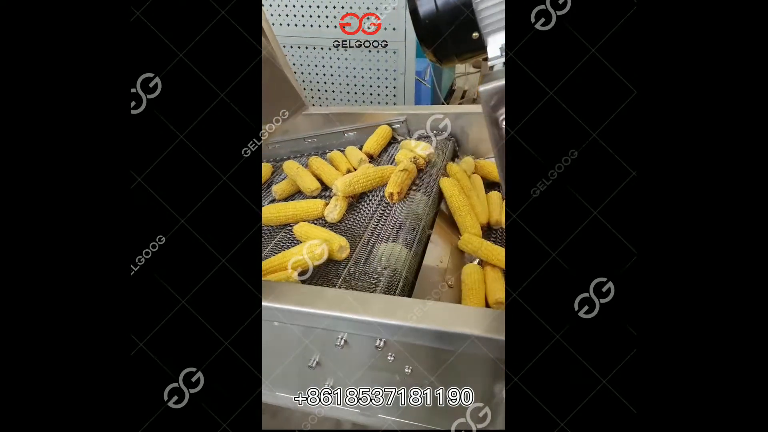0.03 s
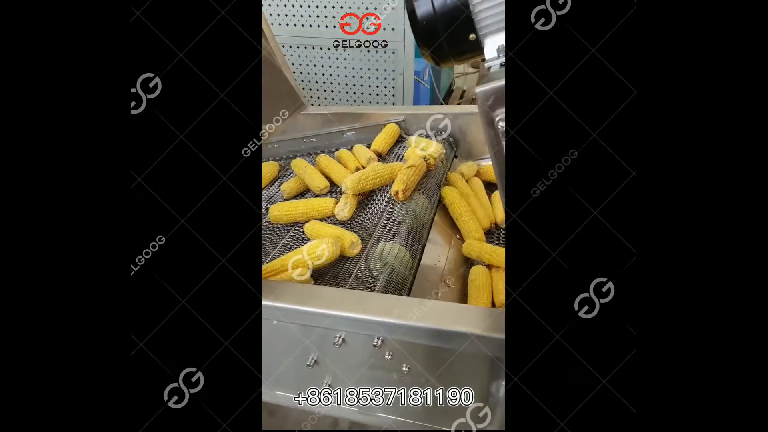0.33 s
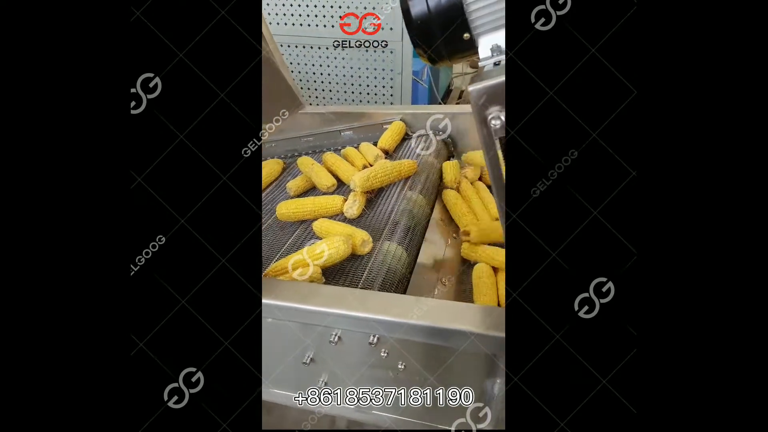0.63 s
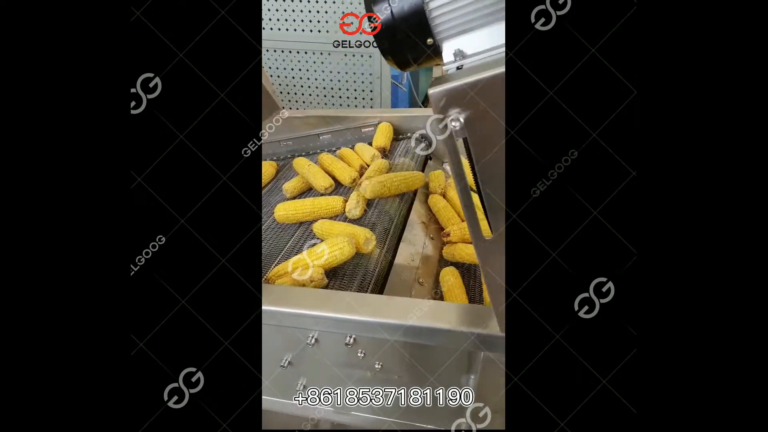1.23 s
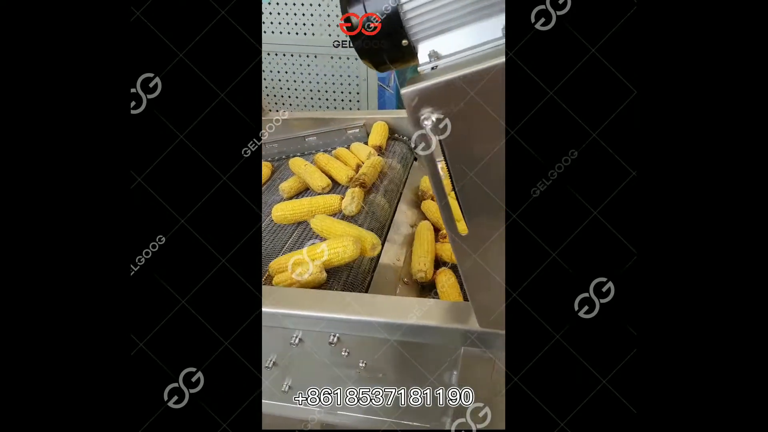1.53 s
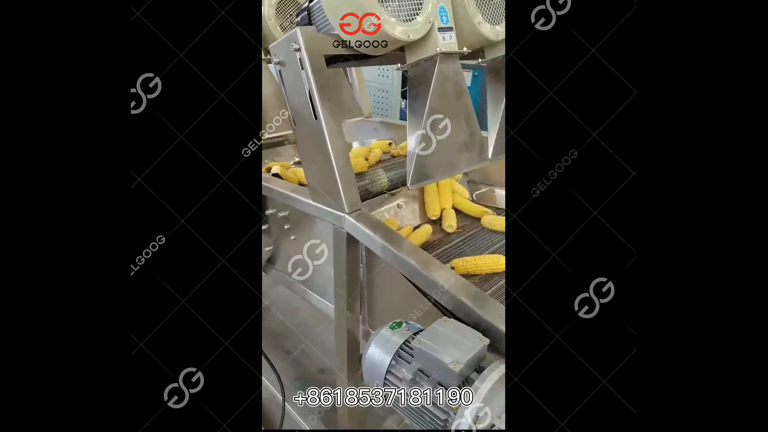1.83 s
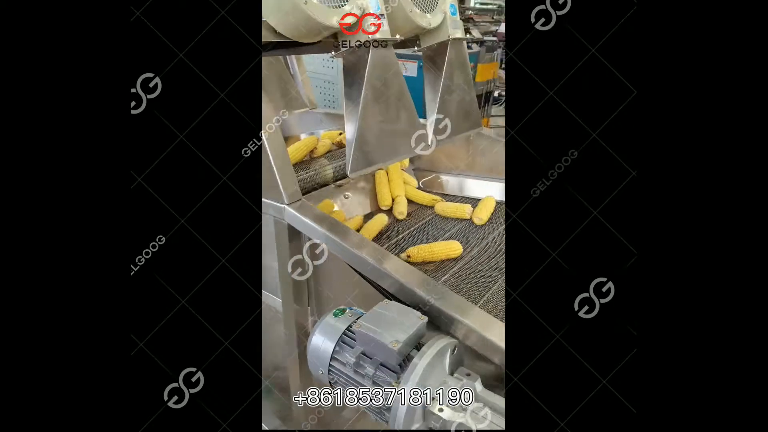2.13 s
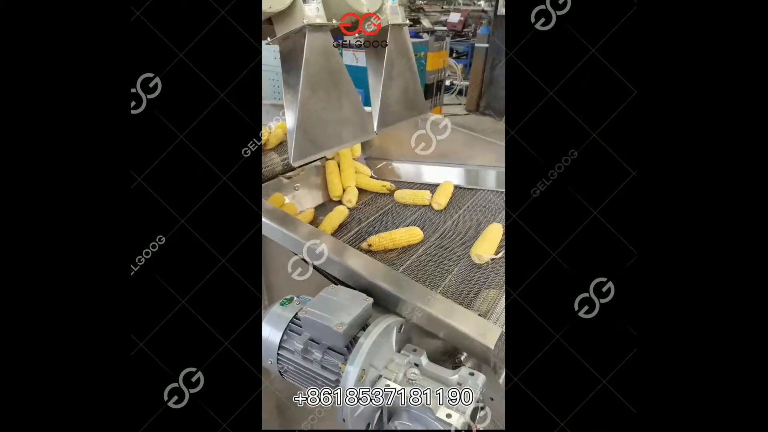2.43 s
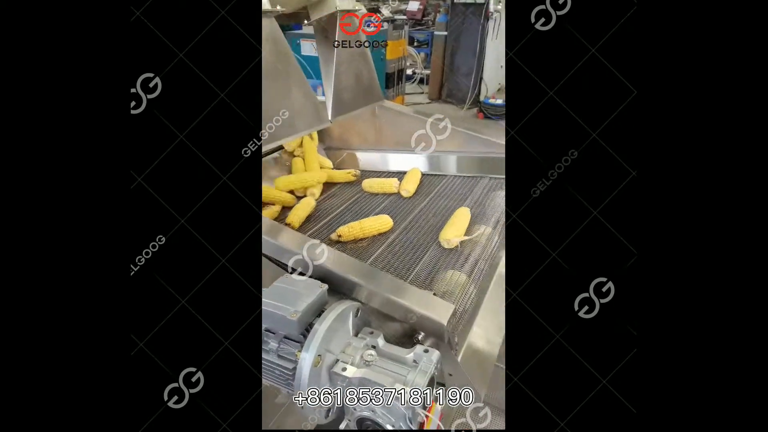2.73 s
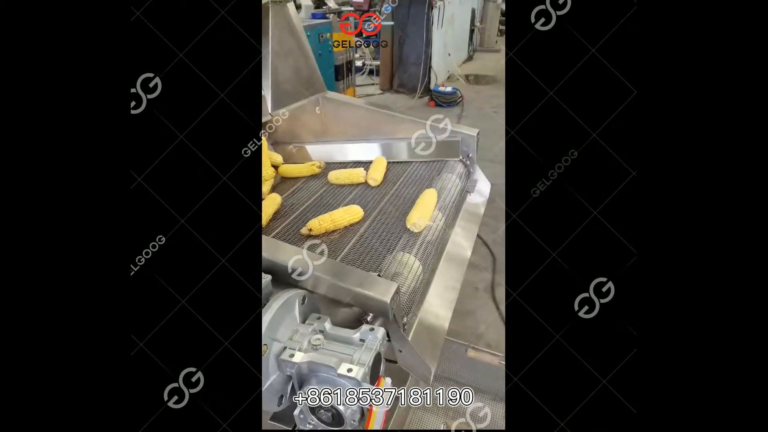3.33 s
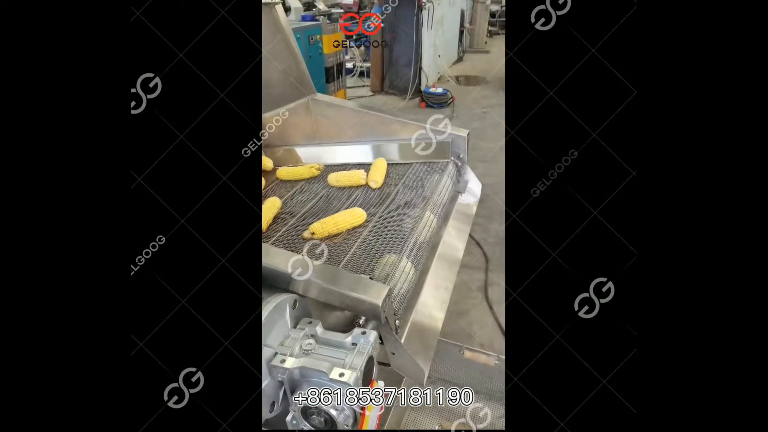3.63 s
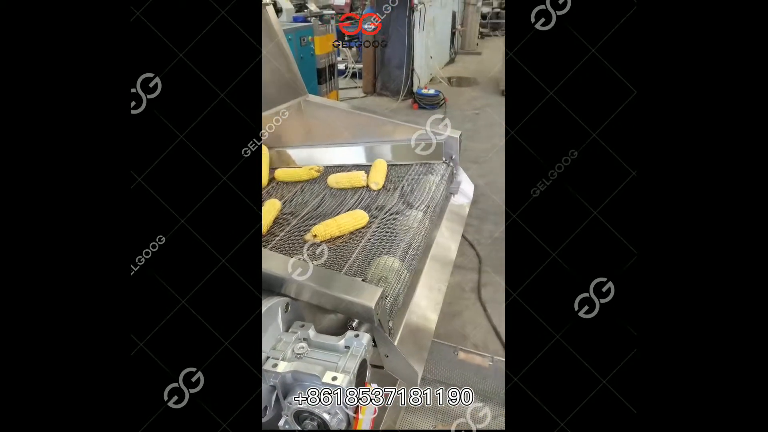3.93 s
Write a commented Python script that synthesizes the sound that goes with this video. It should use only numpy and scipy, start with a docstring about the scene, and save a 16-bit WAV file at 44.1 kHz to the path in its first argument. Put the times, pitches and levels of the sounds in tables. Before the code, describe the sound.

Water jets hiss over churning water, thudding corn cobs and motors in a washing machine.

```python
"""Vegetable washing line in a workshop

Beside the machine, water jets hiss and patter on a mesh conveyor and set the steel chutes ringing.
Churning water rumbles and glugs in the steel tank, corn cobs thud against it, pump and motors whine.
The sound drops out for a moment as the microphone moves from the infeed to the outfeed,
where water splashes near the end."""
import sys
import numpy as np
from scipy import signal
from scipy.fft import rfft, irfft
from scipy.io import wavfile

SR = 44100
rng = np.random.default_rng(int(sys.argv[2]) if len(sys.argv) > 2 else 0)


def dump_mix(stems):
    """Bounce the given channels to the path in sys.argv[1] as a 16-bit WAV at rate SR."""
    frames = np.atleast_2d(stems).T  # one column per channel
    limited = np.clip(frames, -1, 1)  # hard clip at full scale
    pcm = np.round(limited * 32767).astype(np.int16)
    wavfile.write(sys.argv[1], SR, pcm)


N = 176400
T = np.arange(N) / SR
MOVE_S = 1.7435   # the microphone goes from infeed to outfeed


def from_db(db):
    """Decibels to amplitude."""
    return np.exp(np.asarray(db) * np.log(10) / 20)


def rms_one(x):
    """Scale to an rms of 1."""
    return x / np.sqrt(np.mean(x ** 2) + 1e-20)


def in_time(rows):
    """Join (seconds, value) points into a curve over the whole scene."""
    return np.interp(T, *np.transpose(rows))


def at_hz(points, hz):
    """Read (Hz, value) points along a logarithmic frequency axis."""
    freqs, values = np.transpose(points)
    return np.interp(np.log(hz), np.log(freqs), values)


def pan(db):
    """Left and right gains of constant total power, the left louder by db."""
    return rms_one(from_db([[db / 2], [-db / 2]]))


def drift(rate_hz):
    """Smooth random wander with a spread of 1."""
    step, settle = 40, 2000
    r = np.exp(-2 * np.pi * step * rate_hz / SR)
    slow = signal.lfilter([1], [1, -2 * r, r * r], rng.standard_normal(N // step + settle + 2))[settle:]
    return np.interp(np.arange(N) / step, np.arange(len(slow)), rms_one(slow))


def ring(clicks, hz, t60):
    """A unit click sets a sine of height 1 ringing."""
    r, w = np.exp(-np.log(1000) / (t60 * SR)), 2 * np.pi * hz / SR
    return signal.lfilter([0, np.sin(w)], [1, -2 * r * np.cos(w), r * r], clicks + 1e-18)


def resonance(x, hz, width_hz):
    """Two-pole resonance with a gain of 1 at its peak."""
    r, w = np.exp(-np.pi * width_hz / SR), 2 * np.pi * hz / SR
    return signal.lfilter(np.array([1, 0, -1]) * (1 - r * r) / 2, [1, -2 * r * np.cos(w), r * r], x)


def banded_noise(spectrum, balance, low_hz, high_hz, flicker_db, flicker_hz, bands):
    """Stereo noise of rms 1; each band has its own level, flicker and side."""
    # How alike the two channels are. Each row: frequency in Hz, correlation.
    likeness = [(60, 0.53), (130, 0.2), (290, 0.18), (640, 0.053), (1400, 0)]
    out, edges = 0, np.geomspace(low_hz, high_hz, bands + 1)
    white = rng.standard_normal((2, 2, N))
    for k, (low, high) in enumerate(zip(edges, edges[1:])):
        bandpass = signal.butter(3, [low, high], "band", fs=SR, output="sos")
        mid, side = signal.sosfilt(bandpass, white[k % 2])
        hz = np.sqrt(low * high)
        alike = at_hz(likeness, hz)
        gain = from_db(at_hz(spectrum, hz) + flicker_db * drift(flicker_hz)) * pan(at_hz(balance, hz))
        out += gain * (np.sqrt(1 + alike) * mid + np.sqrt(1 - alike) * side * [[1], [-1]])
    return rms_one(out)


def outfeed_share():
    """0 with the microphone at the infeed, 1 at the outfeed, crossing over in 10 ms."""
    return np.clip((T - MOVE_S) / 0.01 + .5, 0, 1)


def motors():
    """Wavering tones; the higher ones are rougher and reach each channel by different reflections."""
    # Pump and motor tones, and a steel chute ringing near 1.9 kHz. Each row: pitch in Hz, width in Hz, level at
    # the infeed in dB, level at the outfeed in dB, left over right in dB.
    tones = [(146.3, 5.6, -44.5, -43, 2), (191, 3.8, -41, -43.5, -6), (345, 3.4, -42.5, -38.5, 0),
             (492.7, 7.2, -46, -44, 5.5), (958, 10, -46.5, -61, 3), (1240, 11, -49.5, -52, 9),
             (1928, 26, -44.5, -51, 5), (12000, 7, -65, -62, 9)]
    steady_below_hz, alike_below_hz = 402, 340
    out = 0
    for hz, width, in_db, out_db, side_db in tones:
        core = steady_below_hz / hz
        paths = np.array([rms_one(core * np.exp(1j * path) + 0.81 * (drift(width) + 1j * drift(width)))
                          for path in range(3)])
        waver = paths[:2] + paths[2] * alike_below_hz / hz   # the third path reaches both channels
        tone = rms_one(np.real(waver * np.exp(2j * np.pi * hz * T)))
        out += tone * pan(side_db) * from_db(in_db + (out_db - in_db) * outfeed_share())
    return out


def pump_whine():
    """The pump sings one wandering tone whose strength flutters in each channel."""
    # Swell of the whine. Each row: time in seconds, level in dB.
    level = [(0, -47), (.2, -42), (.5, -50), (.65, -42), (.76, -48), (1.0, -45.5), (1.35, -41), (1.48, -43),
             (1.58, -43), (2.0, -48), (2.4, -43), (2.66, -47), (2.77, -41), (2.93, -39), (2.98, -47),
             (3.2, -42), (3.5, -47), (4, -43)]
    pitch_hz, wander_hz, flutter_db, apart_radians = 1087, 4.5, 2.6, 0.54
    phase = 2 * np.pi * np.cumsum(pitch_hz + wander_hz * drift(13.5)) / SR
    pair = np.zeros((2, N))
    for channel in range(2):
        tone = np.sin(phase + channel * apart_radians + 0.77 * drift(7.9))
        pair[channel] = tone * from_db(flutter_db * drift(14))
    return rms_one(pair) * pan(2.5) * from_db(in_time(level))


def drops():
    """Drops patter on mesh and steel, each ringing for a few cycles."""
    drops_per_s, level_db, spread_db, cycles = 990, -43, 3, 2
    sizes = from_db(spread_db * np.minimum(rng.exponential(1, (2, N)), 4))
    clicks = sizes * rng.choice([-1, 1], (2, N)) * (rng.random((2, N)) < drops_per_s / SR)
    pitches = np.geomspace(1800, 13000, 12)
    pitch_index = rng.integers(0, len(pitches), (2, N))
    patter = sum(ring(clicks * (pitch_index == k), hz, cycles / hz) for k, hz in enumerate(pitches))
    return from_db(level_db) * rms_one(patter)


def glugs():
    """A pocket of water rings roughly, swelling and dying while its pitch sags."""
    # Hollow glugs in the tank. Each row: start in seconds, peak level in dB, starting pitch in Hz.
    pockets = [(.535, -30, 890), (.675, -30, 910), (1.785, -29, 850), (2.31, -37, 870), (2.655, -36, 888),
               (3.595, -34, 854), (3.685, -37, 836)]
    peak_s, sag_octaves_per_s, roughness_hz = 0.012, 2.83, 53
    out = np.zeros((2, N))
    for start_s, db, hz in pockets:
        age = np.maximum(T - start_s, 0)
        phase = 2 * np.pi * np.cumsum(hz * 2 ** (-sag_octaves_per_s * age)) / SR
        pair = np.array([np.sin(phase + 1.1 * drift(roughness_hz)) for channel in range(2)])
        out += pair * from_db(db) * age / peak_s * np.exp(1 - age / peak_s)
    return out


def splashes():
    """Bursts of spray rise quickly and die away."""
    # Splashes. Each row: start in seconds, level in dB, attack and decay in seconds,
    # centre in Hz, width in octaves.
    bursts = [(.61, -29, 0.0046, 0.018, 6000, 1.0), (1.785, -26.5, 0.028, 0.041, 5000, 1.2),
              (1.785, -24.5, 0.017, 0.014, 710, 1.2), (3.735, -28.5, 0.032, 0.063, 3200, 1.0),
              (3.818, -21.5, 0.01, 0.017, 8200, .65), (3.832, -26, 0.025, 0.033, 5460, .85)]
    out, hz = 0, np.maximum(np.fft.rfftfreq(N, 1 / SR), 1)
    for start_s, db, attack, decay, centre_hz, octaves in bursts:
        band = np.exp(-.5 * (np.log2(hz / centre_hz) / octaves) ** 2)
        noise = rms_one(irfft(rfft(rng.standard_normal((2, N))) * band, N))
        age = T - start_s
        envelope = np.clip(age / attack, 0, 1) * np.exp(-np.maximum(age - attack, 0) / decay)
        out += noise * from_db(db) * envelope
    return out


def tank_water():
    """Churning water shakes the tank and sloshes inside it."""
    # Spectra of rumble and slosh. Each row: frequency in Hz, relative density in dB.
    rumble_spectrum = [(25, -50), (40, -48), (60, -23.5), (80, -13.5), (110, -11), (140, -1.5), (200, -2),
                       (260, -1.5), (350, 3), (410, -5.5), (460, -11.5), (560, -20), (900, -16)]
    slosh_spectrum = [(350, -32), (580, 2), (800, 13), (1100, 0), (2500, 3)]
    # Surges of the churning. Each row: time in seconds, dB added to the rumble.
    churn = [(0, 2), (.35, -1.5), (.62, 2.5), (1.0, -2), (1.5, 1), (1.8, 0), (2.05, -2), (2.4, 0),
             (2.6, -2), (2.85, -3.5), (3.1, -3), (3.55, -1.5), (3.88, -3.5), (4, -2)]
    # Swell of the slosh. Each row: time in seconds, level in dB.
    slosh_level = [(0, -47), (.45, -41), (.6, -37.5), (.7, -37.5), (.8, -42), (1.15, -46), (1.45, -51),
                   (1.7, -50), (2.2, -37), (2.65, -48.5), (3.52, -43.5), (3.61, -34), (3.7, -47), (4, -51)]
    rumble_db = -28
    rumble = banded_noise(rumble_spectrum, [(60, .8), (150, 1.8), (350, 2.5)], 22.66, 969,
                          flicker_db=1.0, flicker_hz=29, bands=18)
    slosh = banded_noise(slosh_spectrum, [(600, 1.2), (1200, 0.89)], 433, 2404,
                         flicker_db=4.5, flicker_hz=11, bands=9)
    return from_db(rumble_db + in_time(churn)) * rumble + from_db(in_time(slosh_level)) * slosh


def cob_thuds():
    """Each cob tumbles softly against the steel tank and rings every mode with a strength of its own."""
    # Cob strikes. Each row: start in seconds, relative level in dB, pitch excited most in Hz,
    # attack in seconds.
    strikes = [(.002, 2.5, 240, 0.0019), (.045, 4.5, 199, 0.0075), (.189, -1, 337, 0.0055),
               (.235, -3, 175, .004), (.4, -1.5, 283, 0.0027), (.44, -2, 350, .01), (.52, 8.5, 108, 0.0069),
               (.605, -4, 160, .003), (.675, -0.5, 210, .005), (0.829, 0, 215, .005),
               (.89, -2, 288, 0.0034), (1.04, -4, 350, 0.0071), (1.311, .5, 186, .007),
               (1.408, 5, 285, .005), (1.425, -2.5, 130, 0.0057), (1.475, -1.5, 350, .008),
               (1.54, 6, 344, .007), (1.59, 3, 245, .005), (1.795, -3, 197, .003), (1.91, -7, 300, .003),
               (2.305, 4.5, 283, .003), (2.309, -1.5, 155, .004), (2.35, -1, 150, .005),
               (2.663, 1.5, 320, .003), (2.684, 0.5, 180, 0.015), (3.209, -2.5, 140, .003),
               (3.345, 2, 187, 0.0069), (3.375, -2.5, 187, .005), (3.455, 0, 200, 0.0073),
               (3.489, -0.5, 325, 0.0033), (3.506, -0.5, 150, .003), (3.551, 0.5, 215, 0.0025),
               (3.575, 4.5, 215, 0.0035), (3.723, -1, 200, 0.0027)]
    # Modes of the tank. Each row: pitch in Hz, relative level in dB, seconds to fall by 60 dB.
    modes = [(104, -4, 0.14), (129.2, -3.5, 0.22), (147, -2.5, 0.27), (189.2, 5, 0.14),
             (228.2, -10.5, 0.44), (254, 1.5, 0.11), (298, -14.5, 0.047), (328.3, 1, 0.15), (383, -1, 0.19)]
    base_db, scatter_db, reach_octaves, low_cut_hz = -22, 1.5, 0.33, 71.5
    out = np.zeros((2, N))
    for start_s, db, centre_hz, attack in strikes:
        start = int(start_s * SR)
        age = T[:min(N - start, SR // 3)]
        for hz, mode_db, t60 in modes:
            strength, turn, apart = rng.standard_normal(3)
            reach = 1 / (1 + (np.log2(hz / centre_hz) / reach_octaves) ** 2)
            level_db = base_db + db + mode_db + scatter_db * strength - 60 * age / t60
            envelope = reach * from_db(level_db) * (1 - np.exp(-age / attack))
            phase = 2 * np.pi * (hz * age + turn) + apart * np.array([[.5], [-.5]])
            out[:, start:start + len(age)] += envelope * np.sin(phase)
    low_cut = signal.butter(3, low_cut_hz, "high", fs=SR, output="sos")
    return signal.sosfilt(low_cut, out) * pan(1.2)


def jets():
    """Jets hiss, coloured by the chutes and the microphone's place; the treble swells with the spray."""
    # Hiss at each end of the line. Each row: frequency in Hz, relative density in dB.
    in_spectrum = [(500, -2.5), (600, -6.5), (900, -7), (1040, -7), (1700, -9.5), (2200, -7), (4000, -8.5),
                   (6000, -12), (8700, -12), (10000, -16.5), (11500, -14.5), (12700, -19), (15500, -21.5)]
    out_spectrum = [(500, -14.5), (600, -5.5), (880, -5), (1020, -8.5), (1700, -8.5), (2200, -7.5),
                    (4700, -7), (5700, -10), (7000, -9), (9000, -11), (10000, -13), (11600, -14.5),
                    (12700, -16), (15500, -20.5)]
    # Stereo balance at each end. Each row: frequency in Hz, left over right in dB.
    in_pan = [(600, 4.5), (1100, -2.5), (2400, 1), (4400, 2), (8100, 3.5), (10000, 0.5), (14000, -0.5)]
    out_pan = [(600, 3.5), (1500, 0), (2200, .5), (3500, 2.5), (5000, 2.2), (8200, 3.5), (10000, 1.5),
               (11500, -6), (13000, 1.5)]
    # Steel chutes ringing in the spray. Each row: pitch in Hz, width in Hz, gain at infeed, at outfeed.
    chutes = [(890, 42, 0.18, 0.28), (1510, 100, 0.4, 0.21), (2104, 84, 0.44, 0.83),
              (2600, 170, 0.045, 0.32), (3140, 140, 0.044, 0.16), (4820, 150, 0.11, 0.29)]
    # Fine spray. Each row: time in seconds, treble gain in dB.
    spray = [(0, 0.2), (.45, 0.8), (.62, 0.5), (1.0, 0.2), (1.6, 0.7), (2.1, -1.1), (2.6, -1), (3.15, -0.5),
             (3.3, 0.9), (3.45, -1.1), (3.75, -0.5), (4, -2.5)]
    infeed_db, outfeed_db, spray_hz = -28.5, -28.13, 5000
    infeed = banded_noise(in_spectrum, in_pan, 447.3, 15900, flicker_db=0.5, flicker_hz=20, bands=22)
    outfeed = banded_noise(out_spectrum, out_pan, 465, 15930, flicker_db=0.6, flicker_hz=15, bands=22)
    share = outfeed_share()
    hiss = from_db(infeed_db) * infeed * (1 - share) + from_db(outfeed_db) * outfeed * share
    hiss += sum(resonance(hiss, hz, width) * (in_gain + (out_gain - in_gain) * share)
                for hz, width, in_gain, out_gain in chutes)
    treble = signal.sosfilt(signal.butter(1, spray_hz, "high", fs=SR, output="sos"), hiss)
    hiss += treble * (from_db(in_time(spray)) - 1)
    return hiss * from_db(0.55 * drift(23))   # the whole hiss flickers slightly


def scene():
    """The whole washing line, heard from beside the machine."""
    return jets() + drops() + tank_water() + glugs() + cob_thuds() + motors() + pump_whine() + splashes()


def record(dry):
    """The sound fades out and back in as the microphone changes place; the highest treble is cut."""
    fade_out_s, fade_in_s, half_gap_s, gap_db, cutoff_hz = 0.039, 0.034, 0.005, -62, 15600
    fade_s = np.where(T < MOVE_S, fade_out_s, fade_in_s)
    closed = np.clip(1 - (np.abs(T - MOVE_S) - half_gap_s) / fade_s, 0, 1)
    faded = dry * from_db(gap_db * closed ** 1.6)
    return signal.sosfilt(signal.ellip(12, .1, 90, cutoff_hz, fs=SR, output="sos"), faded)


dry = scene()
out = record(dry)
dump_mix(out)
```